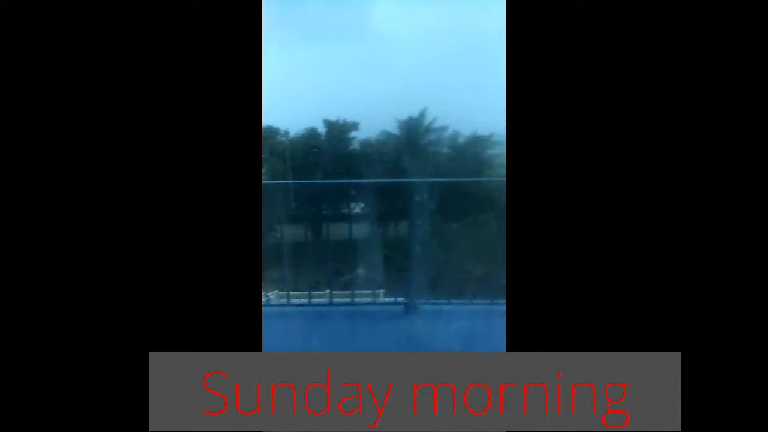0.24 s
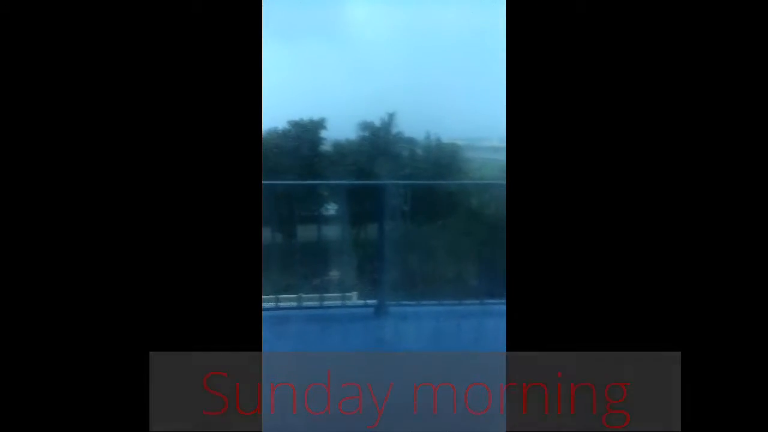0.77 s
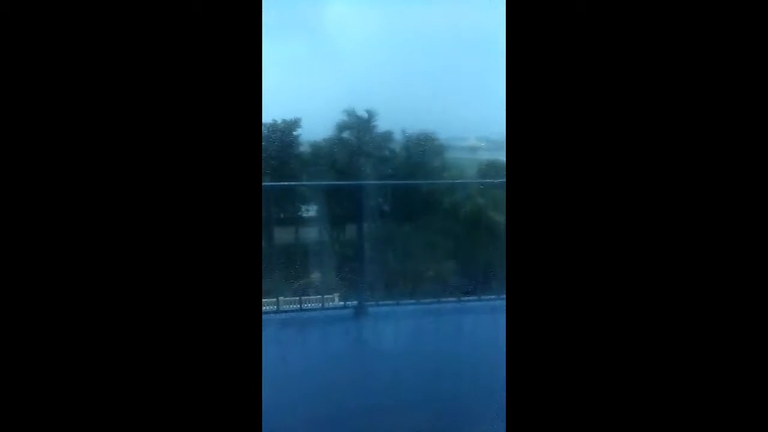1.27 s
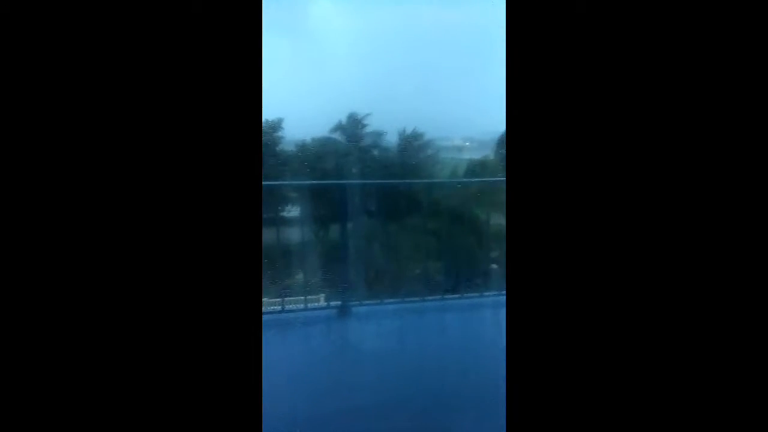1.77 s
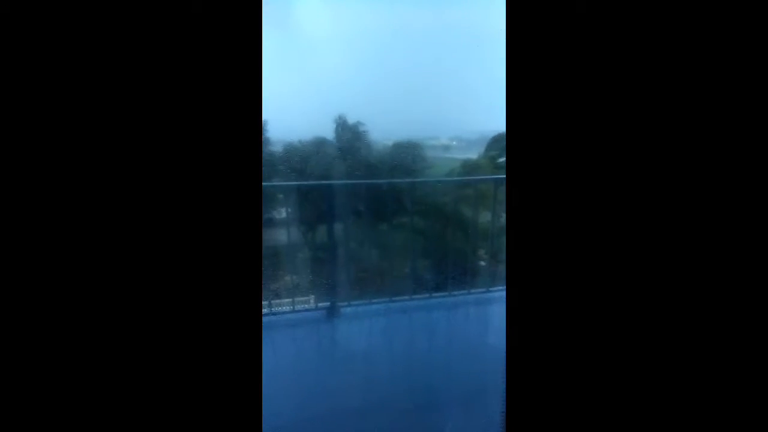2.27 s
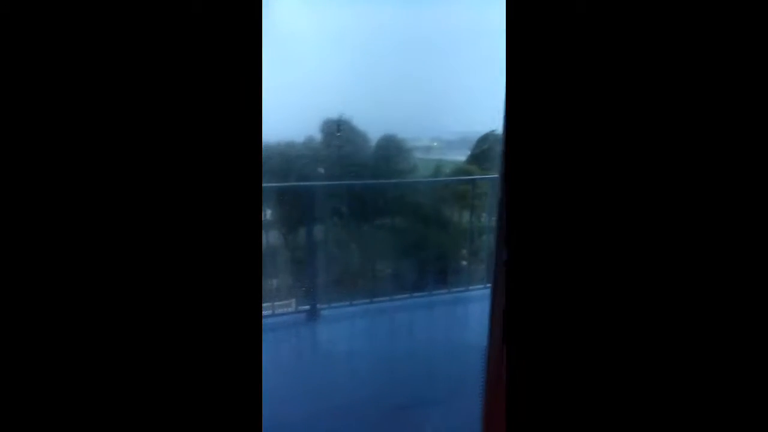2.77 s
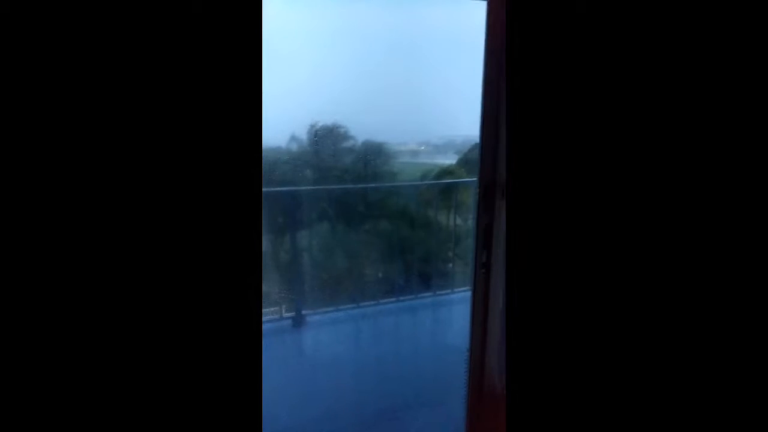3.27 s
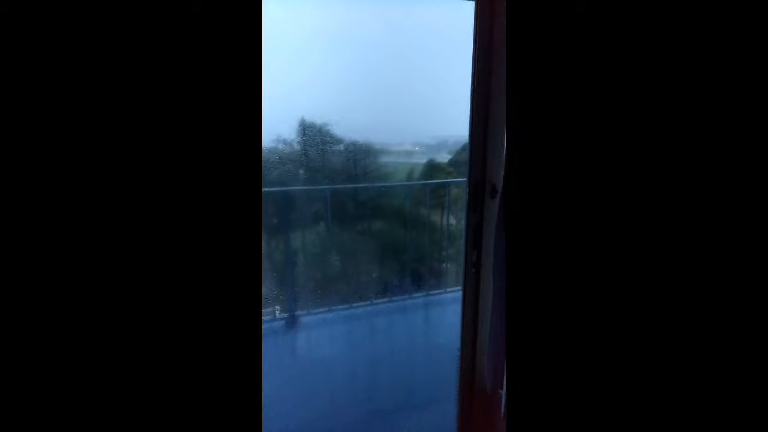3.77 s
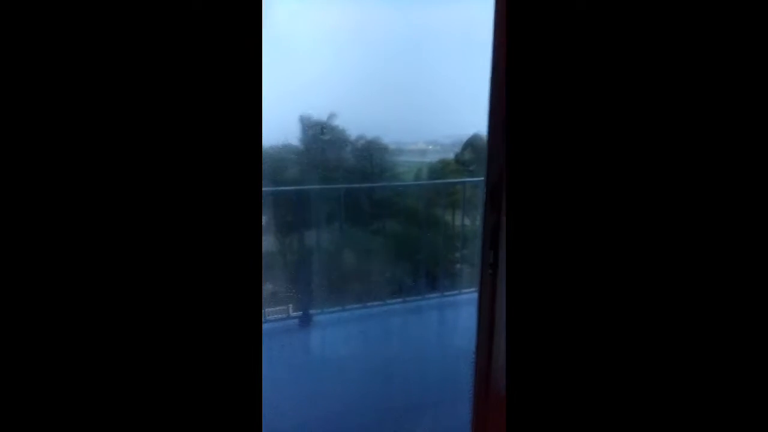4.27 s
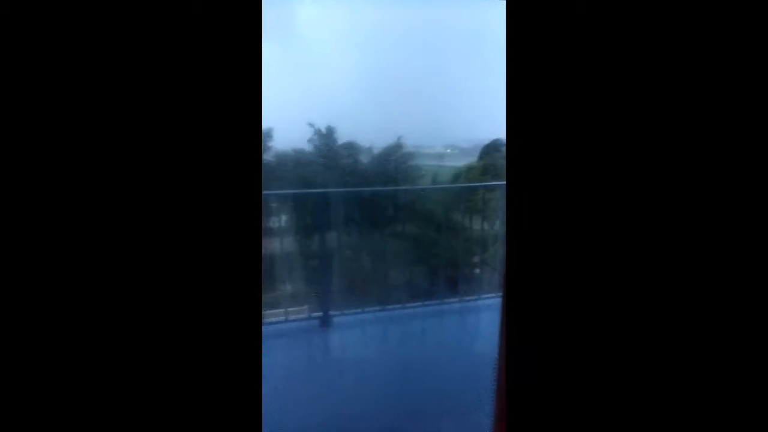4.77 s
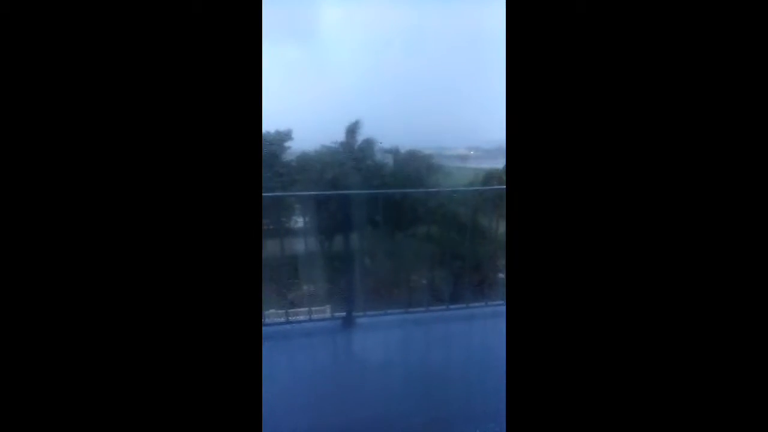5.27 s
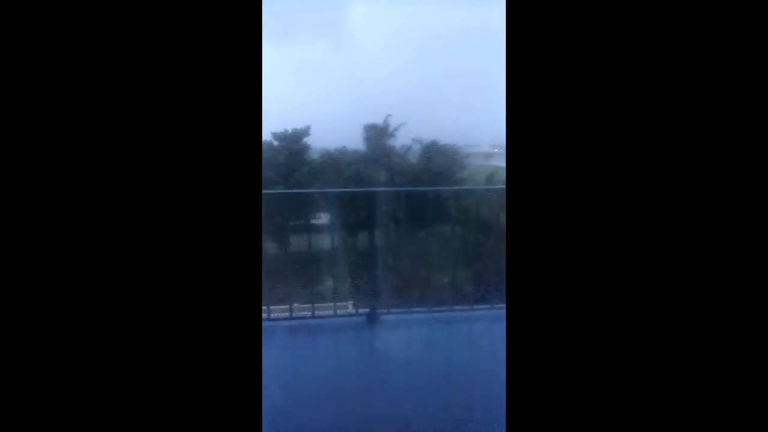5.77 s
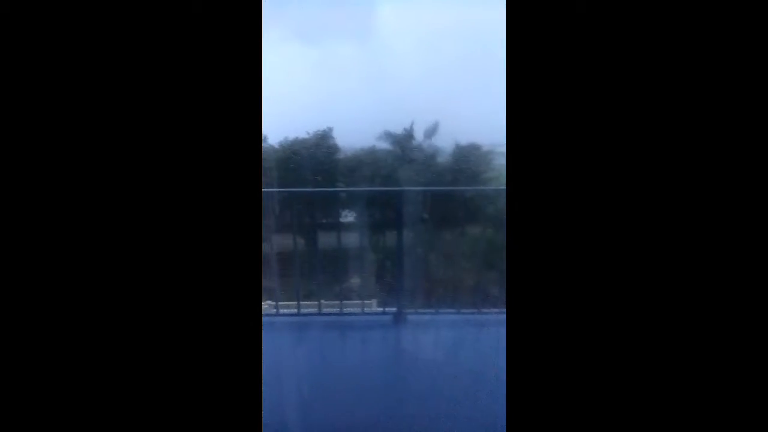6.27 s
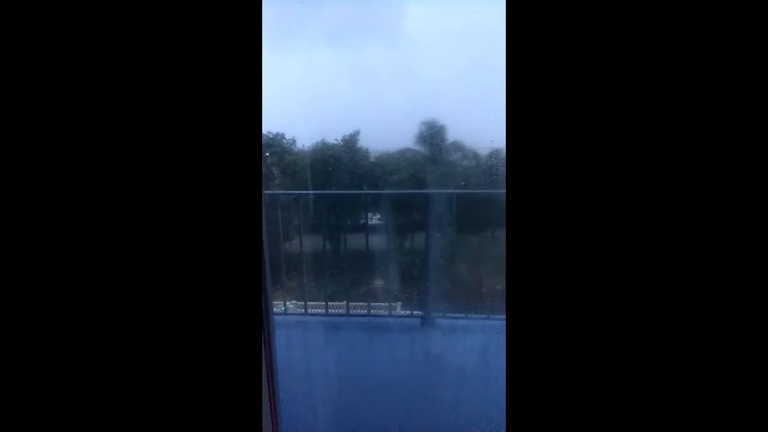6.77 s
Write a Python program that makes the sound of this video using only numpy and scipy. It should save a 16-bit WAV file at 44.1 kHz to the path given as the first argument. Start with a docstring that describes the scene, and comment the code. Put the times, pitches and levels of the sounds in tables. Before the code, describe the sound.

Muffled gusty wind and fine rain hiss outside, with breathy, fluttering high whistles gliding up and down at a leaky window.

```python
"""A gusting storm roar with one deep lull, behind a closed balcony window, with rain and air hissing on top.
Over it, gaps in the frame sing: noise bands on pitches that rise with the wind pressure are their breath,
and short, gliding, wavering tones are the whistles of jets that lock. Faint side notes sputter beside them.
Narrow noise bands make brief low swells in the rumble, two drops tick on the pane as bright decaying noise,
and a small room answers the gaps with a short diffuse tail.
"""
import sys
import numpy as np
from scipy import signal
from scipy.fft import rfft, irfft, next_fast_len
from scipy.io import wavfile
from scipy.ndimage import uniform_filter1d, map_coordinates

SR = 44100
rng = np.random.default_rng(int(sys.argv[2]) if len(sys.argv) > 2 else 0)


def store_wav(level_fs):
    """Save 16-bit WAV to argv[1]."""
    pcm = np.round(np.clip(np.atleast_2d(level_fs), -1, 1) * 32767)
    wavfile.write(sys.argv[1], SR, pcm.T.astype(np.int16))


N = 310023
TIME = np.arange(N) / SR


def amp(db):
    """Decibels to gain."""
    return 10 ** (np.asarray(db) / 20)


def unit(x):
    """Scale to rms 1."""
    return x / np.sqrt(np.mean(np.abs(x) ** 2) + 1e-20)


def along(points, hz):
    """Read (f/Hz, value) points on a log frequency axis."""
    f, value = np.transpose(points)
    return np.interp(np.log(hz + 1), np.log(f + 1), value)


def curve(rows):
    """Draw (t/s, value) points as one value per sample."""
    t, value = np.transpose(rows)
    return np.interp(TIME, t, value)


def wobble(rate):
    """A smooth random curve with rate knots a second."""
    knots = rng.standard_normal(int(N * rate / SR) + 4)
    return map_coordinates(knots, [TIME * rate])


def filtered(x, response):
    """Shape x by a gain that is a function of frequency."""
    m = next_fast_len(N + 8192)
    hz = np.fft.rfftfreq(m, 1 / SR)
    return irfft(rfft(x, m) * response(hz), m)[:N]


def turbulence(spectrum, patchy_db):
    """Turbulent air: coloured noise of rms 1 whose gain drifts in patches of time and pitch."""
    z = signal.stft(rng.standard_normal(N), nperseg=512)[2]
    patches = uniform_filter1d(rng.standard_normal(z.shape), size=8, axis=0)
    patches = uniform_filter1d(patches, size=14, axis=1)
    noise = signal.istft(z * amp(patchy_db * unit(patches)), nperseg=512)[1][:N]
    closed = spectrum + [(spectrum[-1][0] * 2, -120)]  # silent an octave above the last point
    return unit(filtered(noise, lambda hz: amp(along(closed, hz))))


def breath(pitch, width_hz, order=2, spread=1):
    """Eddies round a pitch: noise of rms 1, down to 1/e at 2 * width_hz * spread either side.

    A higher order steepens the edges.
    """
    m = next_fast_len(N)
    offset_hz = np.fft.fftfreq(m, 1 / SR)
    bell = np.exp(-np.abs(offset_hz / (2 * width_hz)) ** order)
    swirl = np.fft.ifft(bell * (rng.standard_normal(m) + 1j * rng.standard_normal(m)))
    position = np.cumsum(spread * np.ones(N)) % m  # faster eddies, wider band
    swirl = np.interp(position, np.arange(m), swirl)
    carrier = np.exp(2j * np.pi * np.cumsum(pitch) / SR)
    return unit(np.real(swirl * carrier))


def eddy_note(s, length, pitch, width_hz, db):
    """A narrow band of eddies that swells and fades around a moment."""
    swell = np.exp(-(2 * (TIME - s) / length) ** 2)
    return amp(db) * swell * breath(pitch, width_hz)


def strand(pitch, wander, sputter_db, jitter=0.00398):
    """A half-locked jet of rms 1: a thin tone that wanders round a pitch and sputters."""
    wandering = pitch * (1 + wander * wobble(22) + jitter * wobble(350))
    phase = 2 * np.pi * np.cumsum(wandering) / SR
    sputter = amp(sputter_db * np.tanh(wobble(28)) + 2 * wobble(110))
    return unit(sputter * np.sin(phase))


# decay time of the small room: (f/Hz, t60/s)
ROOM_DECAY = [(200, 0.086), (3000, 0.69), (12000, 0.0091)]


def room(x):
    """A short diffuse tail of unit energy whose treble dies first."""
    hz, t, z = signal.stft(rng.standard_normal(SR // 2), SR, nperseg=256)
    decay = amp(-60 * t / along(ROOM_DECAY, hz)[:, None])
    tail = signal.istft(z * decay, SR, nperseg=256)[1]
    return signal.fftconvolve(x, tail / np.linalg.norm(tail))[:N]


# strength of the gusts outside, with one deep lull: (t/s, level/dB)
GUST_LEVEL = [(0, -16), (.08, 0), (.74, 0.5), (.88, -11.5), (1.03, -9.5), (1.15, -13.5), (1.37, -10),
              (1.45, -1), (1.56, 2), (1.68, -4.5), (1.78, .5), (2.35, -0.9), (3.1, 0), (3.6, 0.8),
              (4.25, -0.5), (5.7, 0.4), (6.2, 2.5), (7.03, 0)]


def gust():
    """Gust strength in dB, which drives rumble, roar, rush and the widest gap's breath."""
    return curve(GUST_LEVEL)


# colours of the four storm layers, shape only: (f/Hz, level/dB per Hz)
RUMBLE_COLOUR = [(20, -34), (30, -6), (39, 3.5), (50, -3), (60, -1), (72, 1), (98, 4.5), (140, -3.5),
                 (190, -3), (260, -33)]
ROAR_COLOUR = [(130, -32), (195, -5.5), (238, 1), (310, -5), (370, -3), (405, 3), (470, -2), (640, 1.5),
               (730, -3), (880, -5), (1150, -57)]
RUSH_COLOUR = [(650, -37), (920, 0.5), (1150, -1), (1600, 2.5), (2050, 1), (2350, -1.5), (2680, -2),
               (3020, -8.5), (3400, -14), (4200, -30), (5600, -19), (7000, -22), (9000, -33.5),
               (15000, -41)]
HISS_COLOUR = [(3000, -43), (4600, -21), (5600, -11.5), (6800, -10.5), (8400, -7.5), (9400, -8),
               (10800, -1.5), (12200, 2.5), (13200, -1), (14200, -11), (15700, -12)]
# rumble before the gusts act on it: (t/s, level/dB)
RUMBLE_LEVEL = [(0, -55.5), (.75, -56.5), (1.05, -57), (1.55, -55), (2.3, -56), (3.05, -59), (3.8, -57),
                (4.45, -55), (5.2, -53.5), (6.2, -54.5), (7.03, -55)]
# rain hiss, before a constant offset and a wobble are added: (t/s, level/dB)
RAIN_LEVEL = [(0.0, -49), (0.25, -47.5), (1.27, -50.5), (1.53, -45.5), (2.45, -50), (3.72, -47), (3.8, -49),
              (4.13, -47.5), (4.25, -50.5), (5.01, -50), (5.05, -47), (5.35, -52), (6.34, -46), (6.75, -52),
              (6.87, -60), (7.03, -50)]
ROAR_DB, RUSH_DB = -50.5, -49.5  # at 0 dB of gust
RUMBLE_GROWS, ROAR_GROWS, RUSH_GROWS = 0.62, 0.85, 0.82  # dB per dB of gust


def storm():
    """Rumble and roar come through the glass; rush and hiss leak round it."""
    gust_db = gust()
    rumble_db = curve(RUMBLE_LEVEL) + RUMBLE_GROWS * gust_db + 1.13 * wobble(10)
    roar_db = ROAR_DB + ROAR_GROWS * gust_db + 0.12 * wobble(2.98)
    rush_db = RUSH_DB + RUSH_GROWS * gust_db + 0.46 * wobble(11.0)
    hiss_db = curve(RAIN_LEVEL) + 0.33 + 0.67 * wobble(50)  # constant offset, then wobble
    rumble = amp(rumble_db) * turbulence(RUMBLE_COLOUR, patchy_db=0.5)
    roar = amp(roar_db) * turbulence(ROAR_COLOUR, patchy_db=1.2)
    rush = amp(rush_db) * turbulence(RUSH_COLOUR, patchy_db=1.57)
    hiss = amp(hiss_db) * turbulence(HISS_COLOUR, patchy_db=1.62)
    return rumble + roar + rush + hiss


# brief low swells in the rumble: (centre t/s, length between 1/e points t/s, pitch f/Hz,
# width f/Hz (1/e at twice this), peak level/dB)
LOW_SWELLS = [(4.452, 0.19, 130, 18, -59), (5.18, .25, 194.7, 22, -55), (6.85, 0.35, 52, 9, -58)]


def low_swells():
    """Brief low swells in the rumble, each a narrow band of noise."""
    return sum(eddy_note(s, length, np.full(N, hz), width, db) for s, length, hz, width, db in LOW_SWELLS)


# drops on the pane: (t/s, level/dB at the strike)
TICKS = [(1.783, -35), (5.262, -44)]


def ticks():
    """A drop makes a tiny, bright snap on the pane, down 60 dB in 19 ms."""
    strikes = np.zeros(N)
    for s, db in TICKS:
        strikes += amp(db - 60 * np.abs(TIME - s) / 0.019) * (TIME >= s)
    return strikes * turbulence([(5000, -40), (11000, -1), (14000, 5), (16000, -2)], patchy_db=1)


# faint side notes of the gaps: (centre t/s, length between 1/e points t/s, centre pitch f/Hz,
# glide f/Hz per length, width f/Hz (1/e at twice this), peak level/dB before the sputter)
SIDE_NOTES = [(1.461, 0.093, 4330, 2, 30, -51), (2.37, 0.52, 3370, 4, 14, -51),
              (3.8, 0.59, 2150, 0.5, 35.5, -54.5), (3.872, 0.16, 7760, 121, 40, -55),
              (3.979, 0.17, 7060, -950, 55, -60), (4.681, 0.453, 3550, -20, 15.2, -49),
              (5.824, .16, 4000, 31, 55.4, -51), (6.045, 0.19, 8470, 0, 49, -56)]


def side_notes():
    """Other gap resonances swell, glide, sputter and fade."""
    out = np.zeros(N)
    for s, length, hz, glide_hz, width, db in SIDE_NOTES:
        pitch = hz + glide_hz * np.clip((TIME - s) / length, -1, 1)
        out += eddy_note(s, length, pitch, width, db)
    return out * unit(amp(2.5 * np.tanh(wobble(25))))


# wind pressure on the frame, as the pitch it draws from the narrowest gap: (t/s, f/Hz)
PRESSURE = [(0, 4354), (.07, 4650), (.25, 4626), (.38, 4424), (.62, 4660), (.78, 4565), (.91, 4726),
            (1.21, 4510), (1.6, 4500), (1.73, 4730), (1.95, 4870), (2.2, 4390), (2.4, 4347), (2.86, 4663),
            (3.62, 4908), (3.89, 4675), (4.12, 4910), (4.6, 4510), (4.88, 4550), (5.23, 4673), (5.6, 5060),
            (6.03, 5156), (6.38, 5063), (6.8, 4770), (7.03, 4860)]
USUAL_HZ = 4750  # that pitch at the usual pressure


def lift():
    """The factor by which the pressure raises the pitch of the narrowest gap."""
    return curve(PRESSURE) / USUAL_HZ


LOCK_DB = -48.5  # whistle level at which a jet counts as half locked


def lock(locked, low_hz, high_hz, window_s):
    """How firmly the jet in a band is whistling, 0-1, from its smoothed power."""
    tone = filtered(locked, lambda hz: (hz > low_hz) & (hz < high_hz))
    power = np.abs(uniform_filter1d(tone ** 2, size=int(window_s * SR)))
    return power / (power + amp(LOCK_DB) ** 2)


# a thin crack: pitch at the usual pressure, power of its rise, level before drive and ease
CRACK_HZ, CRACK_BEND, CRACK_DB = 6310, 0.6, -57.5
# pressure at which it speaks best, and how far either way it falls to 1/e
CRACK_BEST_HZ, CRACK_RANGE_HZ = 4700, 335


def crack_band(locked):
    """A thin crack sings while the widest gap whistles, and chokes away from its best pressure."""
    rise = lift()
    drive = lock(locked, 2300, 3000, window_s=.15)
    ease = np.exp(-((USUAL_HZ * rise - CRACK_BEST_HZ) / CRACK_RANGE_HZ) ** 2)
    pitch = CRACK_HZ * rise ** CRACK_BEND
    voice = breath(pitch, width_hz=88, order=4) + strand(pitch, wander=.01, sputter_db=6)
    flutter_db = 0.94 * np.tanh(wobble(25))
    return amp(CRACK_DB + flutter_db) * drive * ease * unit(voice)


# breath of the widest gap: pitch at the usual pressure, power of its rise, level at 0 dB of gust
LOW_BREATH_HZ, LOW_BREATH_BEND, LOW_BREATH_DB = 2728, .45, -57


def low_band():
    """The widest gap keeps blowing hollowly with the gusts."""
    pitch = LOW_BREATH_HZ * lift() ** LOW_BREATH_BEND
    level_db = LOW_BREATH_DB + gust() + 2 * np.tanh(wobble(15))
    return amp(level_db) * breath(pitch, width_hz=115, order=3)


# breath of the middle gap before flutter and lock: (t/s, level/dB)
MIDDLE_LEVEL = [(0, -63), (.15, -61), (.46, -65), (.69, -51), (.83, -67), (.9, -59), (1.02, -56),
                (1.35, -57), (1.52, -44.5), (1.7, -61), (1.93, -45), (2.04, -49), (2.12, -51.5), (2.3, -48),
                (2.7, -58), (2.88, -49.5), (3.6, -50.5), (3.85, -53), (3.99, -56), (4.2, -51), (4.48, -44),
                (5.3, -54), (5.87, -51.5), (6.04, -66), (6.17, -52), (6.5, -61.5), (6.74, -55.5),
                (6.84, -49.5), (7.03, -45)]
MIDDLE_HZ, MIDDLE_BEND = 3690, 0.74  # pitch at the usual pressure, power of its rise with pressure


def middle_band():
    """An unlocked jet: a steep-sided band of eddies with a wandering strand inside."""
    pitch = MIDDLE_HZ * lift() ** MIDDLE_BEND
    air = breath(pitch - 10, width_hz=139, order=6)
    thread = strand(pitch, wander=.013, sputter_db=5)
    level_db = curve(MIDDLE_LEVEL) + 2.6 * np.tanh(wobble(40))
    return amp(level_db) * unit(air + amp(-3.5) * thread)


# breath of the narrowest gap, before a constant offset, flutter and lock: (t/s, level/dB)
HIGH_LEVEL = [(0, -54), (.1, -49.5), (.7, -53), (.92, -57), (1.3, -63), (1.44, -53), (1.66, -59),
              (1.84, -49.5), (2.1, -53), (2.4, -55), (2.65, -55.5), (2.78, -48.5), (3.6, -46.5),
              (3.88, -50.5), (4.08, -46), (4.57, -50.5), (4.88, -48.5), (5.28, -50.5), (5.6, -42.5),
              (6.05, -41.5), (6.4, -45.5), (6.72, -51.5), (7.03, -44)]


def high_band():
    """The narrowest gap sputters in a band that pressure lifts and widens; two thin strands compete inside."""
    rise = lift()
    pitch = USUAL_HZ * rise
    air_pitch = (pitch - 25) * (1 + .005 * wobble(25))
    air = breath(air_pitch, width_hz=182, order=8, spread=rise ** 1.8)
    upper = amp(-3.5) * strand(pitch + 50, wander=.011, sputter_db=6)
    lower = amp(-6.5) * strand(pitch - 130 * rise ** 4, wander=.012, sputter_db=6)
    level_db = curve(HIGH_LEVEL) + 0.7 + 2.5 * np.tanh(wobble(40))  # constant offset, then flutter
    return amp(level_db) * unit(air + upper + lower)


# jets that lock into a whistle, from the widest gap, the middle one, the narrowest, then faint high overtones
# of the widest gap's whistles: # (start t/s, length t/s, first pitch f/Hz, glide f/Hz, peak rms level/dB)
WHISTLES = [ (.195, .04, 2600, 0, -50), (.285, .09, 2572, -28, -40), (.505, .115, 2540, 50, -39),
            (.605, .09, 2592, 15, -36.5), (.71, .04, 2612, -20, -43.5), (.765, .04, 2580, -10, -48),
            (1.225, .03, 2540, 0, -53), (1.39, .035, 2555, 0, -46), (1.44, .11, 2535, 40, -40.5),
            (1.845, .05, 2615, 45, -44.5), (2.34, .065, 2500, 0, -47), (2.85, .09, 2570, -30, -51),
            (3.05, .085, 2603, 22, -36), (3.275, .04, 2615, 0, -40), (3.37, .02, 2622, 0, -42),
            (3.42, .04, 2620, 0, -48), (3.52, .12, 2615, 10, -41), (3.64, .065, 2715, 45, -46),
            (3.73, .1, 2618, 12, -39.5), (4.05, .05, 2620, 0, -50), (4.12, .08, 2645, -25, -44),
            (4.19, .11, 2624, -10, -40.5), (4.32, .025, 2590, 0, -46), (4.44, .1, 2585, -25, -44),
            (4.72, .03, 2550, 0, -48), (4.81, .075, 2572, -10, -40.5), (4.92, .05, 2550, 10, -44.5),
            (5.05, .04, 2580, 0, -40), (5.105, .035, 2588, 15, -44), (5.16, .055, 2598, 22, -40.5),
            (5.24, .04, 2610, 0, -49), (5.615, .078, 2822, -16, -30.3), (5.7, .09, 2785, -22, -38),
            (5.79, .1, 2760, 25, -37.5), (5.925, .085, 2790, 70, -40), (6.01, .07, 2860, -60, -42),
            (6.1, .08, 2860, -60, -39.5), (6.185, .05, 2750, 0, -43), (6.24, .06, 2770, 60, -42.5),
            (6.325, .075, 2808, 4, -35), (6.4, .075, 2815, -5, -38), (6.48, .03, 2800, 0, -47),
            (6.64, .06, 2630, -20, -49), (6.86, .04, 2560, 30, -45.5), (6.92, .14, 2575, 90, -39.5),
            (.085, .03, 3600, 20, -49), (.13, .1, 3640, -65, -43.5), (.29, .11, 3570, -45, -45),
            (.49, .09, 3520, 50, -46), (.58, .11, 3600, 70, -48.5), (.695, .1, 3625, -75, -43),
            (.87, .04, 3650, 0, -49), (.96, .12, 3620, -40, -53), (1.09, .17, 3560, -90, -52),
            (1.27, .065, 3485, 35, -48), (1.45, .07, 3516, 0, -45), (1.52, .04, 3700, 40, -47),
            (1.597, .066, 3480, 35, -38.7), (1.72, .12, 3720, 20, -48), (1.92, .11, 3794, -15, -44),
            (2.15, .09, 3485, 10, -44.5), (2.3, .1, 3509, -20, -41.5), (2.57, .04, 3534, -20, -45),
            (3.0, .13, 3720, 10, -47), (3.29, .06, 3740, -30, -49), (3.39, .15, 3805, 0, -44.5),
            (3.55, .13, 3780, -30, -47), (3.72, .13, 3760, -10, -47), (4.135, .075, 3750, 15, -44.5),
            (4.2, .18, 3773, -30, -43), (4.39, .11, 3745, -30, -41.5), (4.5, .09, 3600, -30, -46.5),
            (4.6, .09, 3690, 20, -47), (4.72, .05, 3715, 10, -40), (4.76, .11, 3590, -50, -43.5),
            (4.92, .08, 3705, 20, -41), (5.14, .05, 3620, 0, -50), (5.415, .035, 3835, 0, -42.5),
            (.06, .06, 4680, 0, -47), (.16, .11, 4660, 50, -48.5), (.58, .1, 4640, 50, -48),
            (.72, .1, 4480, -20, -48), (.865, .03, 4660, 120, -46), (1.4, .13, 4700, 20, -46),
            (1.79, .05, 4770, 130, -45), (3.055, .035, 4970, 0, -46), (3.17, .1, 4850, -30, -47),
            (3.97, .05, 4800, 0, -46), (4.07, .05, 4980, 50, -45), (4.32, .11, 4740, 30, -47),
            (5.48, .15, 5120, 90, -42.5), (5.66, .13, 5190, -40, -41), (5.8, .11, 5150, 60, -39.5),
            (5.94, .14, 5290, 40, -44), (6.1, .14, 5190, -50, -43), (6.27, .12, 5190, -30, -41),
            (6.74, .06, 4840, 0, -47), (6.83, .1, 4820, -20, -46), (6.94, .08, 4870, 70, -45),
            (2.31, .08, 6000, 0, -55), (4.2, .14, 6400, -50, -56), (4.45, .08, 6130, 40, -56),
            (4.79, .08, 6170, -70, -50), (4.89, .06, 6040, 90, -52), (5.0, .1, 6140, 20, -53),
            (5.615, .04, 5680, -40, -48), (5.7, .13, 5590, -60, -51), (5.93, .21, 5660, 0, -49),
            (6.22, .04, 5630, 20, -53), (6.35, .1, 5620, 30, -52)]
EDGE_S, RELEASE_S = .012, .014  # half the time a whistle takes to catch; time constant of its dying
SWELL_DB = 5.5  # rise from either end to the middle
LOW_HZ = 2620  # pitch of the widest gap


def whistles(waver=0.0032, jitter=0.0035, flutter_hz=29, flutter_db=3.2, fuzz=0.08, octave_db=-32):
    """Each locked jet swells, glides and lets go; eddies shake its pitch and make it flutter."""
    out = np.zeros(N)
    slow, fast, grain = wobble(35), wobble(400), wobble(600)
    flutter = np.tanh(breath(np.full(N, flutter_hz), width_hz=15))  # the jet flaps at an uneven rate
    for start, length, hz, glide_hz, db in WHISTLES:
        span = np.flatnonzero((TIME > start - EDGE_S) & (TIME < start + length + 10 * RELEASE_S))
        t = TIME[span] - start
        progress = np.clip(t / length, 0, 1)

        eddies = (span + rng.integers(N)) % N  # every whistle meets its own eddies
        looseness = np.interp(db, [-36, -30], [1, .35])  # the hardest-blown jets hold steadiest
        shake = looseness * (waver * slow[eddies] + jitter * fast[eddies])
        shake *= np.sqrt(hz / LOW_HZ)  # higher jets are less steady
        phase = 2 * np.pi * np.cumsum((hz + glide_hz * progress) * (1 + shake)) / SR

        attack = np.sin(np.pi / 2 * np.clip(t / (2 * EDGE_S) + .5, 0, 1))
        release = np.exp(-np.maximum(t - length, 0) / RELEASE_S)
        swell = attack * release * amp(db - SWELL_DB * (2 * progress - 1) ** 2)

        roughness = np.interp(hz, [5000, 6000], [fuzz, 4 * fuzz])  # the faint high overtones rasp
        flapping = amp(looseness * flutter_db * flutter[eddies])
        flapping = unit(flapping * (1 + roughness * grain[eddies]))
        overblown = amp(octave_db) * (hz < 3000)  # low jets carry a faint octave
        tone = unit(np.sin(phase) + overblown * np.sin(2 * phase))
        out[span] += swell * flapping * tone
    return out


MIDDLE_LOCK_TAKES_DB, HIGH_LOCK_TAKES_DB = 2.5, 2  # breath lost by a fully locked jet
ROOM_DB = -13


def scene():
    """The gaps ring in the room, over the storm; whistles in the middle and narrowest gaps weaken the breath there."""
    locked = whistles()
    middle_lock = lock(locked, 3300, 4000, window_s=.04)
    high_lock = lock(locked, 4500, 5500, window_s=.04)
    middle = amp(-MIDDLE_LOCK_TAKES_DB * middle_lock) * middle_band()
    high = amp(-HIGH_LOCK_TAKES_DB * high_lock) * high_band()
    gaps = locked + low_band() + middle + high + crack_band(locked) + side_notes()
    background = storm() + low_swells() + ticks()
    return (background + gaps + amp(ROOM_DB) * room(gaps))[None]


def record(dry):
    """The microphone keeps nothing above its band limit of 15750 Hz."""
    return filtered(dry[0], lambda hz: hz < 15750)[None]


dry = scene()
out = record(dry)
store_wav(out)
```